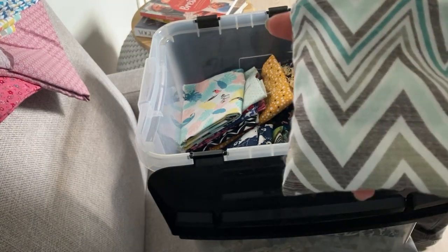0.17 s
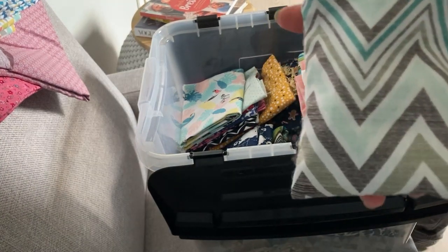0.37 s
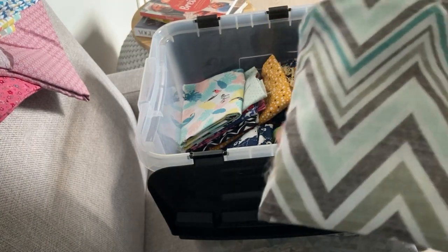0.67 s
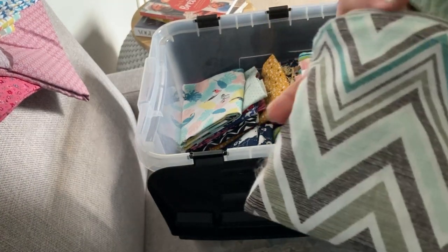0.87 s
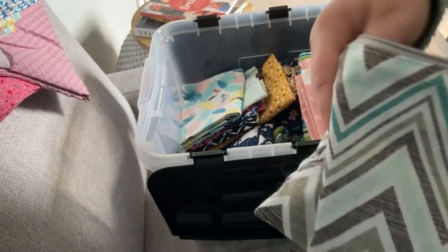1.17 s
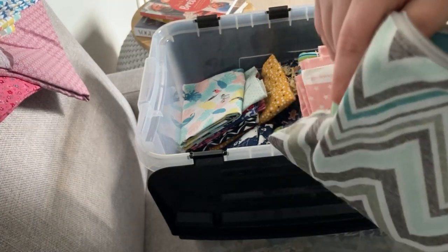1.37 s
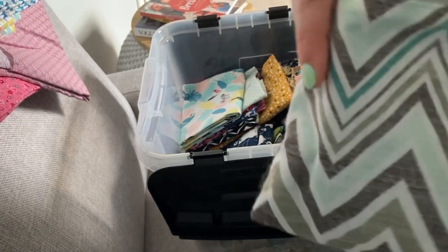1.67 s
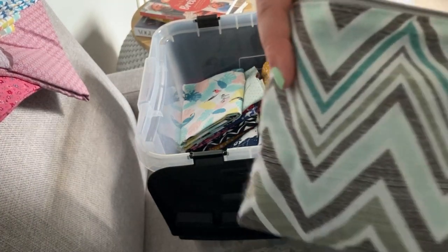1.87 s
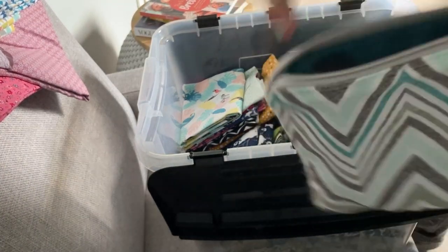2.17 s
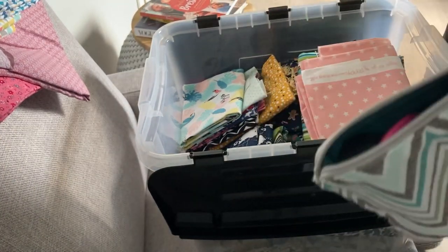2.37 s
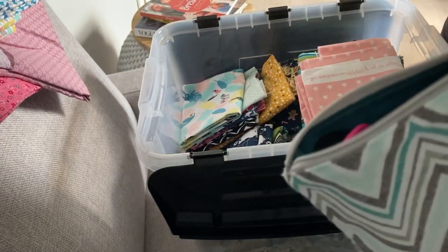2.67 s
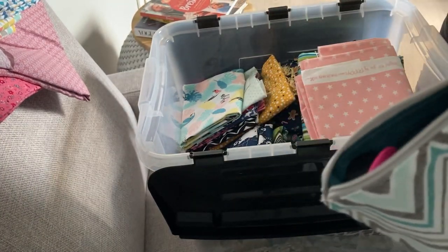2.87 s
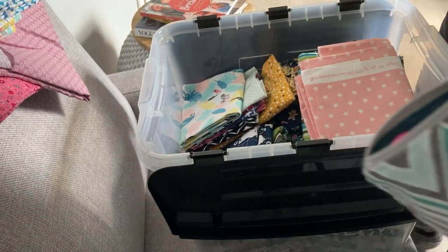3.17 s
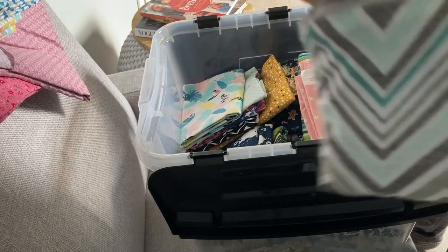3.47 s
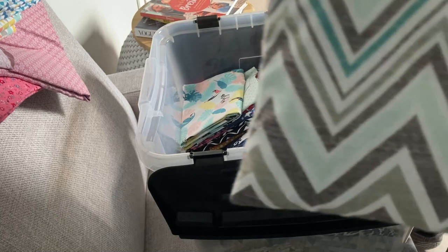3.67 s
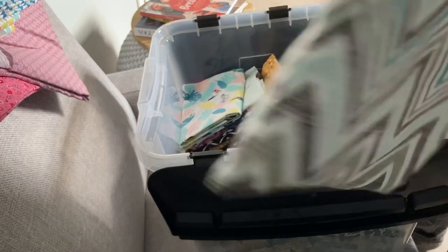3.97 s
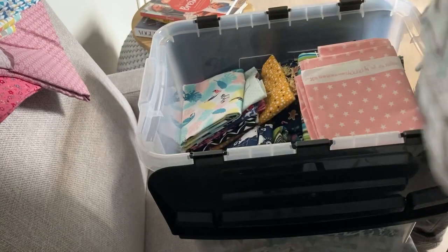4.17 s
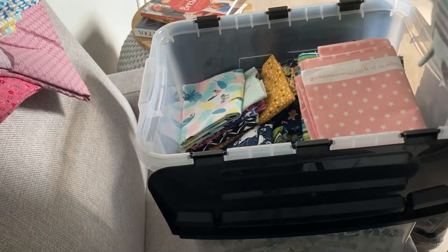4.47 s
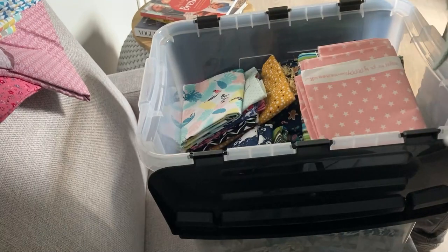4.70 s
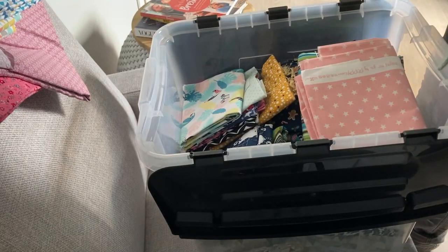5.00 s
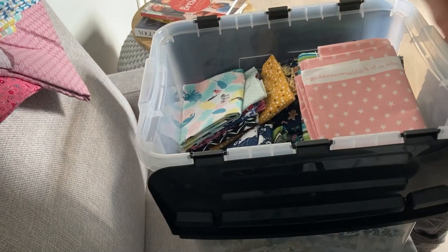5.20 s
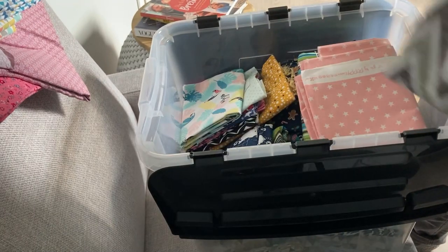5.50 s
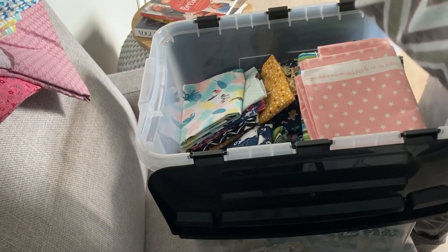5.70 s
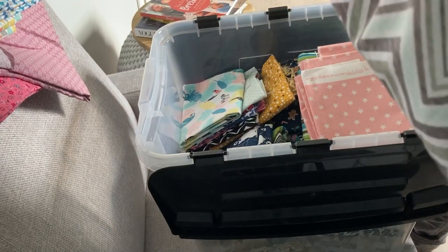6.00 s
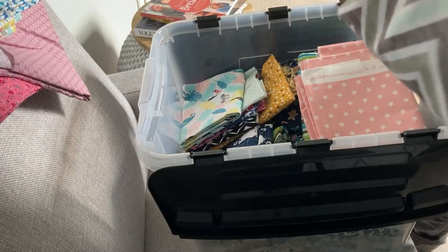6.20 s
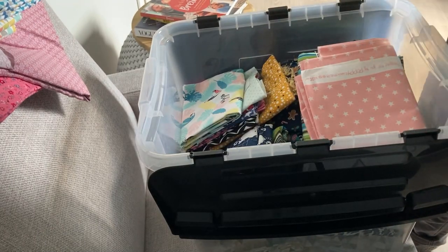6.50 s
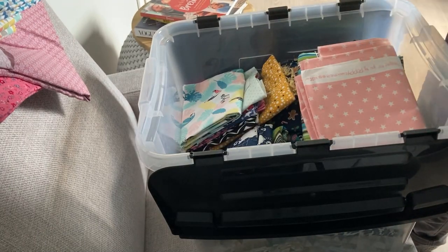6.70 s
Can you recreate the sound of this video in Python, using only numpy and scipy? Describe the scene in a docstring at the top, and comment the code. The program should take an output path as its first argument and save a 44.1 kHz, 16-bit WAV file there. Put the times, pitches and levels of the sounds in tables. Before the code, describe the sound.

A cloth pouch rustles and flicks in the hands, its zipper run in two quick buzzing strokes, with metal tab clinks and hollow knocks.

```python
"""Cloth rustles and flicks, a metal pull tab clinks, something hollow knocks; a zipper runs in two quick strokes.
A cloth pouch is handled close to two microphones in a furnished room, over a low hum with faint hiss.
Cloth is random slips through filters; tab and hollow contents are ringing modes set off by short touches.
Zipper teeth pluck the tape and gate scrape noise, so buzz, rasp and hiss follow the slider speed."""
import sys
import numpy as np
from scipy import signal
from scipy.fft import rfft, irfft, next_fast_len
from scipy.io import wavfile

SR = 44100
rng = np.random.default_rng(int(sys.argv[2]) if len(sys.argv) > 2 else 0)


def put_to_file(sound):
    """Save the sound as 16-bit audio at rate SR, in the file named by the first command-line argument."""
    columns = np.atleast_2d(sound).T  # one column per channel
    safe = np.clip(columns, -1, 1)
    whole_steps = np.round(safe * 32767)
    wavfile.write(sys.argv[1], SR, whole_steps.astype(np.int16))


N = 302085

# All levels in dB are relative: later gains, filters and the room still act on them.
# Colour of room hum and hiss. Each row: frequency in Hz, level in dB.
ROOM_TONE_SPECTRUM = [(15, -18.5), (35, -2.5), (50, -4), (60, 10), (72, -4.5), (110, -8), (250, -24),
                      (600, -38.5), (1500, -41), (6000, -44.5), (10000, -50), (15500, -64.5)]
# Hands rub the cloth. Each row: start in seconds, length in seconds, rustle in dB, fold crumple in dB.
RUBS = [(0.347, 0.15, -71, -87.5), (0.463, 0.21, -62, -63), (0.818, 0.54, -61.5, -62),
        (0.673, .1, -57.5, -64), (0.72, 0.022, -70, -55), (1.191, 0.079, -52.5, -53),
        (1.416, 0.37, -64.5, -67), (1.645, 0.063, -60, -58), (1.853, 0.287, -67, -68.5),
        (2.334, 0.37, -66.5, -76.5), (2.125, 0.23, -63, -74), (2.215, 0.078, -58.5, -83),
        (2.633, 0.01, -60, -54), (2.988, 0.3, -65.5, -78), (3.432, 0.031, -47.5, -45.5),
        (3.512, 0.13, -69.5, -72), (3.668, 0.15, -72, -78), (3.936, .06, -66, -79),
        (4.016, 0.1, -62.5, -79), (4.109, 0.046, -53, -65), (4.166, 0.41, -63.5, -73),
        (4.21, 0.16, -59.5, -57), (4.69, 0.15, -61, -65.5), (4.946, 0.59, -67.5, -65.5),
        (4.976, 0.14, -63, -62.5), (5.167, 0.021, -64.5, -58), (5.393, 0.073, -55.5, -55.5),
        (5.5, 0.24, -63.5, -62.5), (5.793, 0.17, -65, -66.5), (5.701, 0.013, -77, -53),
        (6.183, 0.18, -66, -63.5), (6.459, 0.16, -64.5, -55), (6.615, 0.16, -68, -72.5)]
RUB_ATTACK_S, RUB_RELEASE_S, RUB_SAG_DB_PER_S = 0.025, 0.039, 4.5  # a long rub eases off
HELD_RUSTLE_DB, HELD_CRUMPLE_DB = -82, -78.5  # the cloth is never quite still in the hands
# Colours of slipping threads and of folds. Each row: frequency in Hz, level in dB.
RUSTLE_SPECTRUM = [(200, -10.5), (900, -3.5), (2000, 2.5), (3000, 0.5), (4500, 3), (6500, 0), (8400, 1),
                   (10000, 2.5), (12500, 1), (15500, -6)]
CRUMPLE_SPECTRUM = [(60, -15), (150, -3), (350, 1.5), (700, 1.5), (1000, -6), (2000, -17.5), (8000, -14.5)]
# Hard things slide inside the pouch. Each row: start in seconds, length in seconds, level in dB.
SHIFTS = [(.58, 0.046, -61.5), (.68, .05, -61), (1.25, 0.074, -54), (1.67, 0.024, -55.5),
          (2.215, 0.12, -60.5), (2.53, 0.045, -67.5), (5.43, 0.053, -56), (5.54, 0.093, -57.5),
          (5.66, 0.062, -57)]
SHIFT_ATTACK_S, SHIFT_RELEASE_S = 0.0078, 0.022
RATTLE_IN_RUB_DB = -7.5  # every rub stirs them a little too
# Dry scrape of the hard things. Each row: frequency in Hz, level in dB.
SCRAPE_SPECTRUM = [(400, -29.5), (1050, 14), (1400, 7.5), (2000, 2.5), (2600, -10.5), (5000, -12)]
# Modes of the hollow body. Each row: frequency in Hz, level in dB, T60 in seconds.
HOLLOW_MODES = [(755, -20, 0.017), (1062, -2, 0.028), (1384, 7.5, 0.025), (1683, -3.5, 0.025),
                (2005, -6.5, 0.017), (2630, -8.5, 0.0078)]
# Pull tab clinks. Each row: start in seconds, level in dB.
CLINKS = [(0.303, -57), (0.3297, -51), (0.3879, -45.5), (2.3978, -48), (3.98, -36.5), (4.0039, -17),
          (4.008, -38.5), (4.0305, -38), (4.0363, -26.5), (4.0864, -26), (4.108, -33), (4.116, -33.5),
          (4.1677, -27), (4.2744, -26.5), (4.372, -38), (4.402, -38.5), (4.7976, -35.5), (5.0607, -38.5)]
# Modes of the tab damped by the fingers. Each row: frequency in Hz, level in dB, T60 in seconds.
TAB_HELD_MODES = [(4300, -36.5, 0.011), (7150, -16, 0.035), (6470, -0.5, 0.013), (8400, -42.5, 0.0061),
                  (9900, 0, 0.019), (11600, -24.5, 0.0094), (13500, -14, 0.0033)]
# Dry tick of the tab. Each row: frequency in Hz, level in dB.
TICK_SPECTRUM = [(400, -37.5), (1400, -33), (2500, -27), (4300, -3.5), (5300, -11.5), (7000, 2.5),
                 (9000, 0), (11500, 7), (13500, -3), (15500, -6)]
# Hollow knocks. Each row: start in seconds, level in dB, tilt towards the high modes in dB per octave.
KNOCKS = [(0.542, -44, -17), (0.553, -45, -7), (0.563, -27, -17.5), (1.236, -37.5, -2), (1.253, -44, 2),
          (2.51, -46.5, -24.5), (3.5598, -32, 4), (4.004, -52, 12), (4.169, -44, -4), (4.538, -34.5, 8),
          (5.452, -39.5, 8), (5.597, -43.5, 15.5), (6.617, -50, -4), (6.74, -57, 16)]
# Cloth flicks and slider catches. Each row: start in seconds, level in dB, body re top in dB, T60 in seconds.
FLICKS = [(0.562, -27, 1.5, 0.0075), (0.6828, -35, -29, .018), (0.867, -47, 0, .017),
          (0.987, -40, -4, 0.15), (0.9986, -26, -20, 0.017), (1.1924, -32.5, -1, 0.0086),
          (1.231, -18, -32, .018), (1.301, -35, -19, .028), (2.1485, -46, 2.5, .023),
          (2.3248, -34.5, -25, 0.016), (2.53, -44.5, 5, .015), (2.658, -32, -3, 0.048),
          (3.1424, -37, -5, .05), (3.1788, -26.5, -16, .007), (3.4268, -19.5, -20, 0.0089),
          (3.514, -32.5, -11, 0.026), (4.2359, -40, 11, 0.03), (4.2478, -33.5, -13, 0.029),
          (4.2747, -53, 11, .04), (4.3146, -32, -3, 0.042), (4.439, -39, -10, 0.15),
          (4.5383, -19.5, -8, 0.016), (5.0106, -39, -20, .03), (5.2325, -37.5, 0.5, 0.021),
          (5.418, -53, -8, .042), (5.7268, -44, 16.5, 0.018), (6.5262, -38, -11, 0.04),
          (6.499, -44.5, -17, 0.24), (6.5704, -29, -15, 0.0087)]
# Colours of the sharp burst and of the panel behind it. Each row: frequency in Hz, level in dB.
FLICK_TOP_SPECTRUM = [(300, -10), (2000, -7.5), (4000, -3), (7000, -1.5), (9000, -0.5), (11500, -0.5),
                      (15500, -11.5)]
FLICK_BODY_SPECTRUM = [(80, -8.5), (300, 22.5), (800, -10), (1400, 11), (2200, 3.5), (3500, -28),
                       (9000, -21)]
# Air pushed by the moving cloth. Each row: start in seconds, length in seconds, level in dB.
PUFFS = [(.755, 0.073, -48.5), (1.12, 0.13, -58.5), (2.66, 0.023, -58), (3.46, 0.04, -58),
         (3.75, 0.026, -67), (4.17, 0.04, -53.5), (4.52, .27, -58.5), (5.71, 0.053, -59.5)]
PUFF_ATTACK_S, PUFF_RELEASE_S = 0.01, 0.018
# Colour of the pushed air. Each row: frequency in Hz, level in dB.
PUFF_SPECTRUM = [(15, -18.5), (35, -13.5), (60, 5), (95, -3), (150, -12.5), (300, -20.5), (800, -27),
                 (4000, -57)]
# Slider speed in each pull. Each row: time in seconds, tooth pairs per second.
FIRST_PULL = [(3.145, 110), (3.185, 272), (3.258, 300), (3.305, 386), (3.33, 475), (3.385, 686),
              (3.41, 750), (3.44, 376), (3.472, 235), (3.515, 64)]
SECOND_PULL = [(4.44, 125), (4.47, 190.2), (4.51, 370), (4.545, 493.7), (4.58, 516.2), (4.66, 603.3),
               (4.698, 627.7), (4.732, 237.8), (4.78, 100.5)]
SLIDER_RAMP_S = 0.0024
# Zipper level growth with speed, in dB per doubling from a brisk pull.
BRISK_TEETH_PER_S = 500
BUZZ_GROWTH_DB, RASP_GROWTH_DB, HISS_GROWTH_DB = 8, 8.5, 11.5
# The slider binds at seams and near its track ends.
# Each row: centre in seconds, half length in seconds, extra hiss in dB, extra rasp in dB.
BINDS = [(3.18, 0.051, 16, 7), (3.427, 0.017, 13.5, 2.5), (3.457, 0.023, 7, 7), (4.516, 0.025, 2.5, 5.5),
         (4.7, .018, 5, -0.5)]
# share of extra rasp dB given to the buzz; evenness lost in dB per dB of extra hiss
BIND_BUZZ_SHARE, BIND_UNEVEN_DB = 0.3, 0.7
# Colours of plucked tape, tooth edges and slider. Each row: frequency in Hz, level in dB.
TAPE_SPECTRUM = [(100, -8), (215, 2.5), (450, 1.5), (680, -9.5), (850, -6.5), (1050, 8.5), (1380, -3),
                 (1700, 3), (2100, 4), (3000, -19.5), (6000, -41), (16000, -43)]
RASP_SPECTRUM = [(150, -10), (400, 2.5), (1200, -2.5), (2100, 2.5), (3000, 3.5), (4200, 0.5), (5600, -6),
                 (8000, -5), (16000, -10)]
HISS_SPECTRUM = [(1000, -33), (4500, -2), (6500, -2), (7600, -1), (8700, -3.5), (10000, 1), (12000, -1.5),
                 (13500, -3), (15500, -9)]
# How well the cloth panel radiates a steady swing. Each row: frequency in Hz, level in dB.
PANEL_RESPONSE = [(120, -1.5), (280, -1.5), (400, -8), (530, -9), (610, 6.5), (800, -5), (900, 3),
                  (1020, -1.5), (1200, -2.5), (1400, 4), (1700, 1.5), (2150, 6.5), (3000, -12), (5000, -27)]
# Multiples 1 to 6 of the tooth-pair rate; two tooth rows mesh in turn, favouring even ones.
# Each entry: level in dB.
OVERTONES_DB = [-4.5, 2, -11, -7, -15.5, -11]
# The loose pull tab swings and rings freely. Each row: start in seconds, level in dB.
TINKLES = [(5.023, -46), (5.062, -42), (5.095, -44.5), (5.247, -56)]
# Modes of the free tab. Each row: frequency in Hz, level in dB, T60 in seconds.
TAB_FREE_MODES = [(12250, -4, .04), (12100, 1, 0.12), (14500, -6, .035), (14850, 6, .04)]
# Left port against right. Each row: frequency in Hz, lag in radians, power share of scattered sound.
PORTS = [(50, 0, .04), (200, .55, .16), (600, .8, .17), (1400, .75, .15), (2400, 1.0, .38), (3600, 1.7, .6),
         (4900, 3.1, .55), (7200, 6.3, .2), (9250, 9.42, .02), (11400, 12.6, .15), (13600, 15.7, .02),
         (15700, 18.8, .12)]
ROOM_T60_S, CUTOFF_HZ = 0.23, 15900


def from_db(db):
    """Amplitude ratio of a level in dB."""
    return 10 ** (np.asarray(db) / 20)


def rms_one(x):
    """Scales a signal to rms 1."""
    return x / np.sqrt(np.mean(x ** 2) + 1e-20)


def in_time(rows):
    """One curve per column, a value for every sample."""
    s, *columns = np.transpose(rows)
    return [np.interp(np.arange(N) / SR, s, c) for c in columns]


def drift(rate):
    """Smooth random curve of rms 1, with rate knots per second."""
    knots = rng.standard_normal(N // 20)
    return rms_one(np.interp(np.arange(N) / SR * rate, np.arange(len(knots)), knots))


def coloured(x, spectrum, size=8192):
    """Causal (minimum-phase) filter of unit energy that follows a spectrum."""
    hz, db = np.transpose(spectrum)
    grid = np.maximum(np.fft.rfftfreq(size, 1 / SR), 1)
    cepstrum = irfft(np.log(from_db(np.interp(np.log(grid), np.log(hz), db))))
    # fold the cepstrum onto positive time
    cepstrum[1:size // 2] *= 2
    cepstrum[size // 2 + 1:] = 0
    response = irfft(np.exp(rfft(cepstrum)))
    return signal.oaconvolve(x, response / np.linalg.norm(response))[:N]


def ring(clicks, hz, t60):
    """A two-pole resonator: a unit click sets a decaying sine of height 1 ringing."""
    r = from_db(-60 / (t60 * SR))
    w = 2 * np.pi * hz / SR
    return signal.lfilter([0, np.sin(w)], [1, -2 * r * np.cos(w), r * r], clicks + 1e-18)


def grains(per_s, spread_db):
    """Random tiny slips of uneven size; rms 1."""
    sizes = from_db(spread_db * np.minimum(rng.exponential(1, N), 4))
    slips = rng.random(N) < per_s / SR
    return rms_one(slips * sizes * rng.choice([-1, 1], N))


def dying_noise(t60, size=12000):
    """Noise that starts at rms 1 and dies away."""
    return rng.standard_normal(size) * np.exp(-np.log(1000) * np.arange(size) / SR / t60)


def add(track, s, sound):
    """Mixes a sound in from time s."""
    at = int(s * SR)
    track[at:at + len(sound)] += sound[:N - at]


def swells(events, attack_s, release_s, sag_db_per_s=0):
    """Gain of (start, length, dB) events: each rises, may sag and dies away; overlaps add in power."""
    t, power = np.arange(N) / SR, np.full(N, 1e-12)
    for start, length, db in events:
        age = t[int(start * SR):] - start
        rise = np.minimum(age / attack_s, 1)
        shape = rise * np.exp(-np.clip((age - length) / release_s, 0, 20))
        power[N - len(age):] += (from_db(db - sag_db_per_s * age) * shape) ** 2
    return np.sqrt(power)


def strikes(events, modes, chatter_db, chatter_t60):
    """Each touch (s, dB, optional tilt) chatters briefly and rings every mode with a strength of its own."""
    click = np.arange(2000) == 0
    touches = [from_db(chatter_db) * dying_noise(chatter_t60, size=2000) + click for _ in events]
    out = np.zeros(N)
    centre_hz = np.exp(np.mean(np.log([hz for hz, _, _ in modes])))
    for hz, mode_db, t60 in modes:
        force = np.zeros(N)
        for (s, db, *tilt), touch in zip(events, touches):
            level_db = db + mode_db + sum(tilt) * np.log2(hz / centre_hz)
            add(force, s + .0006, from_db(level_db + 1.5 * rng.standard_normal()) * touch)
        out += ring(force, hz, t60)
    return out


def room_tone(level_db):
    """A low hum and faint hiss from filtered noise, mostly alike on both sides."""
    shared = rng.standard_normal(N)
    sides = [coloured(shared + 0.27 * rng.standard_normal(N), ROOM_TONE_SPECTRUM) for _ in range(2)]
    return from_db(level_db) * np.array(sides)


def shifting(x, depth_db, rate):
    """Bands swell and fade on their own as the folds change shape."""
    for hz in np.geomspace(1500, 11000, num=5):
        sos = signal.butter(1, [hz / 1.25, hz * 1.25], "band", fs=SR, output="sos")
        band = signal.sosfilt(sos, x)
        x = x + band * (from_db(depth_db * drift(rate)) - 1)
    return x


def cloth(rustle, crumple):
    """Threads slip over each other and over the fingers, a few snag and crackle; folds give a duller sound."""
    snags = .9 * grains(per_s=130, spread_db=3.5)
    slips = grains(per_s=2700, spread_db=-3.0) + 0.99 * rng.standard_normal(N)
    threads = shifting((slips + snags) * from_db(1.5 * drift(90)), depth_db=2.5, rate=12)
    folds = grains(per_s=810, spread_db=4.5) * from_db(2.0 * drift(50))
    rustling = rustle * from_db(-4.0) * coloured(threads, RUSTLE_SPECTRUM)
    return rustling + crumple * from_db(-5.5) * coloured(folds, CRUMPLE_SPECTRUM)


def rattle(gain):
    """Small uneven touches keep the hollow body ringing; a wandering contact point favours other modes."""
    touches = grains(per_s=450, spread_db=3.0)
    modes = sum(from_db(db + 4.5 * drift(18)) * ring(touches, hz, t60) for hz, db, t60 in HOLLOW_MODES)
    scrape = coloured(touches, SCRAPE_SPECTRUM)
    return gain * (from_db(-3.5) * rms_one(modes) + from_db(-4) * scrape)


def handling():
    """Each rub makes the cloth rustle and crumple and stirs the contents, which now and then slide."""
    rub_shape = RUB_ATTACK_S, RUB_RELEASE_S, RUB_SAG_DB_PER_S
    rustle = swells([(s, length, db) for s, length, db, _ in RUBS], *rub_shape)
    crumple = swells([(s, length, db) for s, length, _, db in RUBS], *rub_shape)
    sliding = swells(SHIFTS, SHIFT_ATTACK_S, SHIFT_RELEASE_S)
    held_rustle = np.hypot(rustle, from_db(HELD_RUSTLE_DB))
    held_crumple = np.hypot(crumple, from_db(HELD_CRUMPLE_DB))
    stirred = np.hypot(sliding, from_db(RATTLE_IN_RUB_DB) * rustle)
    return cloth(held_rustle, held_crumple) + rattle(stirred)


def clinks(ring_db, tick_db, tick_t60):
    """The tab hits the slider: a dry tick and a ring that the fingers damp."""
    ticks = np.zeros(N)
    for s, db in CLINKS:
        add(ticks, s + 0.00067, from_db(db + tick_db) * dying_noise(tick_t60))
    rings = strikes(CLINKS, TAB_HELD_MODES, chatter_db=-22, chatter_t60=0.0076)
    return coloured(ticks, TICK_SPECTRUM) + from_db(ring_db) * rings


def knocks(level_db, low_cut_hz):
    """Hard things bump inside the pouch; they are too small to radiate any bass."""
    rings = strikes(KNOCKS, HOLLOW_MODES, chatter_db=-24, chatter_t60=.015)
    low_cut = signal.butter(2, low_cut_hz, "high", fs=SR, output="sos")
    return from_db(level_db) * signal.sosfilt(low_cut, rings)


def flicks(top_db, body_db):
    """Taut cloth lets go with a sharp noise burst; the panel behind it sounds with the same decay."""
    top, body = np.zeros((2, N))
    for s, db, body_share_db, t60 in FLICKS:
        add(top, s, from_db(db + top_db) * dying_noise(t60))
        add(body, s, from_db(db + body_share_db + body_db) * dying_noise(t60))
    return coloured(top, FLICK_TOP_SPECTRUM) + coloured(body, FLICK_BODY_SPECTRUM)


def puffs():
    """Moving cloth pushes air: low-coloured noise in short swells."""
    return swells(PUFFS, PUFF_ATTACK_S, PUFF_RELEASE_S) * coloured(rng.standard_normal(N), PUFF_SPECTRUM)


def binding():
    """Extra hiss and rasp in dB that come and go smoothly where the slider binds."""
    t = np.arange(N) / SR
    extra_db = np.zeros((2, N))
    for s, half_s, hiss_db, rasp_db in BINDS:
        extra_db += np.outer([hiss_db, rasp_db], np.exp(-np.minimum(((t - s) / half_s) ** 2, 20)))
    return extra_db


def zipper(pull, jitter, uneven_db, scrape_db, evenness, buzz_db, rasp_db, hiss_db, grip):
    """Each tooth plucks the tape and sets off a short scrape in the slider; speed and friction set the levels."""
    rate, = in_time(pull)
    doublings = np.log2(rate / BRISK_TEETH_PER_S)
    bind_hiss_db, bind_rasp_db = binding()
    buzz = from_db(buzz_db + BUZZ_GROWTH_DB * doublings + BIND_BUZZ_SHARE * bind_rasp_db)
    rasp = from_db(rasp_db + RASP_GROWTH_DB * doublings + bind_rasp_db)
    hiss = from_db(hiss_db + HISS_GROWTH_DB * doublings + bind_hiss_db)
    even = np.clip(evenness * from_db(-BIND_UNEVEN_DB * bind_hiss_db), 0, .9)
    t = np.arange(N) / SR
    moving = np.clip(np.minimum(t - pull[0][0], pull[-1][0] - t) / SLIDER_RAMP_S + 1, 0, 1)
    teeth = np.cumsum(rate * (1 + .022 * drift(130))) / SR + jitter * drift(700)
    passed = np.maximum.accumulate(np.floor(teeth))
    strength = from_db(uneven_db * drift(600))
    plucks = (np.diff(passed, prepend=passed[0]) - rate / SR) * np.sqrt(SR / rate) * strength
    # the scrape is strongest just as a tooth snaps in
    contact = rms_one(np.exp(-grip * (teeth % 1)) * strength)
    tape_scrape = from_db(scrape_db) * contact * rng.standard_normal(N)
    tape = rms_one(coloured(plucks + tape_scrape, TAPE_SPECTRUM))
    # in an even run the panel swings with the teeth; overtones flare as they cross its resonances
    hz, db = np.transpose(PANEL_RESPONSE)
    swing = 0
    for k, overtone_db in enumerate(OVERTONES_DB, 1):
        level_db = np.interp(k * rate, hz, db) + overtone_db + 2.5 * drift(70)
        swing = swing + from_db(level_db) * np.sin(2 * np.pi * (k * teeth + rng.random()))
    panel = np.sqrt(1 - even) * tape + np.sqrt(even) * swing
    edges = rms_one(coloured(contact * rng.standard_normal(N) + 1.3 * plucks, RASP_SPECTRUM))
    slider = coloured(contact * rng.standard_normal(N) + .4 * plucks, HISS_SPECTRUM)
    return moving * (buzz * panel + rasp * edges + hiss * slider)


def tinkles(level_db):
    """The loose tab swings and rings its high modes freely."""
    return from_db(level_db) * strikes(TINKLES, TAB_FREE_MODES, chatter_db=-24, chatter_t60=.01)


def scattered(x, count=8):
    """Echoes off the moving hands and cloth, up to 5 ms late, each waxing and waning."""
    weights = np.array([drift(25) for _ in range(count)])
    weights /= np.linalg.norm(weights, axis=0)
    lags = (rng.uniform(.0003, .005, count) * SR).astype(int)
    return sum(weight * np.pad(x, (lag, 0))[:N] for weight, lag in zip(weights, lags))


def microphones(x, room_db):
    """The direct sound reaches the left port late; near echoes and the room differ at each port."""
    size = next_fast_len(N + SR // 2)
    hz, lag, share = np.transpose(PORTS)
    grid = np.fft.rfftfreq(size, 1 / SR)
    lag = np.interp(grid, hz, lag)
    share = np.clip(np.interp(grid, hz, share), 0, 1)
    source, out = rfft(x, size), []
    for turn in (-lag / 2, lag / 2):
        tail = dying_noise(ROOM_T60_S)
        tail[:int(.004 * SR)] = 0
        room = from_db(room_db) * rfft(tail / np.linalg.norm(tail), size)
        direct = np.sqrt(1 - share) * np.exp(1j * turn)
        echoes = np.sqrt(share) * rfft(scattered(x), size)
        out.append(irfft(source * (direct + room) + echoes, size)[:N])
    return np.array(out)


def scene():
    """The pouch and its zipper in front of the microphones."""
    pouch = handling() + clinks(ring_db=-15.5, tick_db=0.5, tick_t60=0.0054)
    pouch += knocks(level_db=-6, low_cut_hz=960) + flicks(top_db=-7.0, body_db=-15.5) + puffs()
    pouch += zipper(FIRST_PULL, jitter=0.024, uneven_db=2.5, scrape_db=-10.5, evenness=0.57,
                    buzz_db=-44.0, rasp_db=-47.5, hiss_db=-48.5, grip=1.1)
    pouch += zipper(SECOND_PULL, jitter=0.036, uneven_db=1.0, scrape_db=0.5, evenness=0.57,
                    buzz_db=-46.5, rasp_db=-44.0, hiss_db=-42, grip=1.0)
    pouch += tinkles(level_db=-7)
    return microphones(pouch, room_db=-14.5) + room_tone(level_db=-66.0)


def record(dry):
    """A steep elliptic low-pass cuts the top."""
    return signal.sosfilt(signal.ellip(12, .2, 80, CUTOFF_HZ, fs=SR, output="sos"), dry)


dry = scene()
out = record(dry)
put_to_file(out)
```